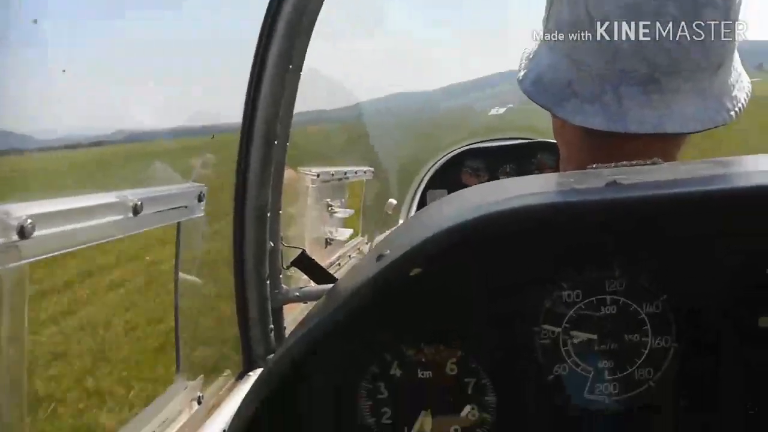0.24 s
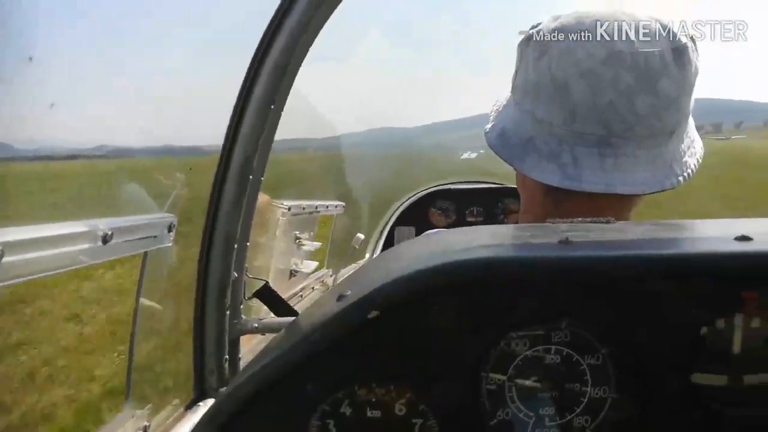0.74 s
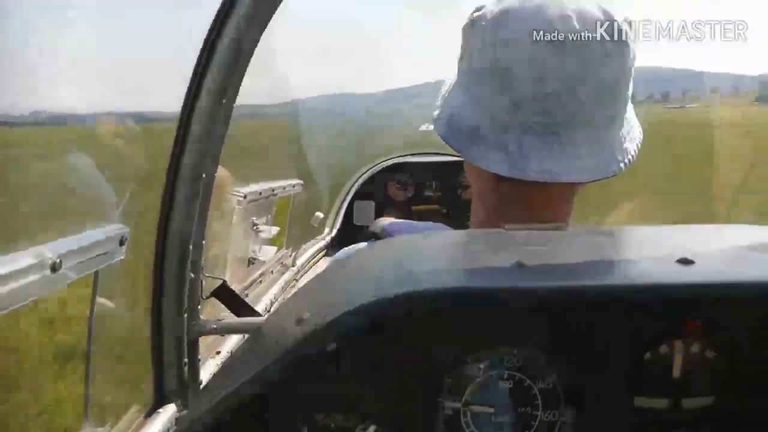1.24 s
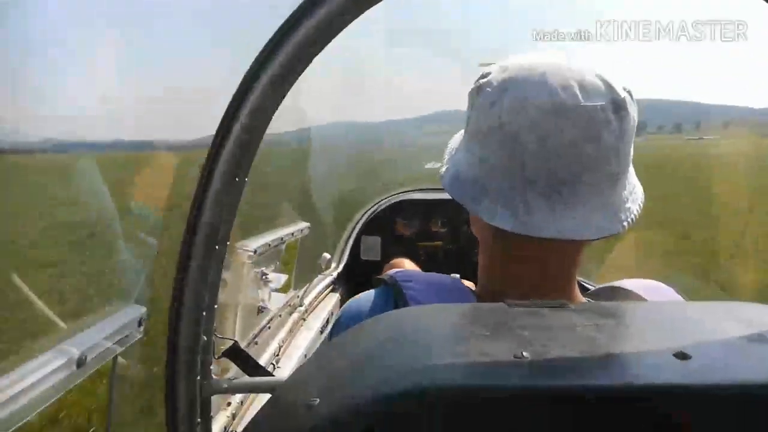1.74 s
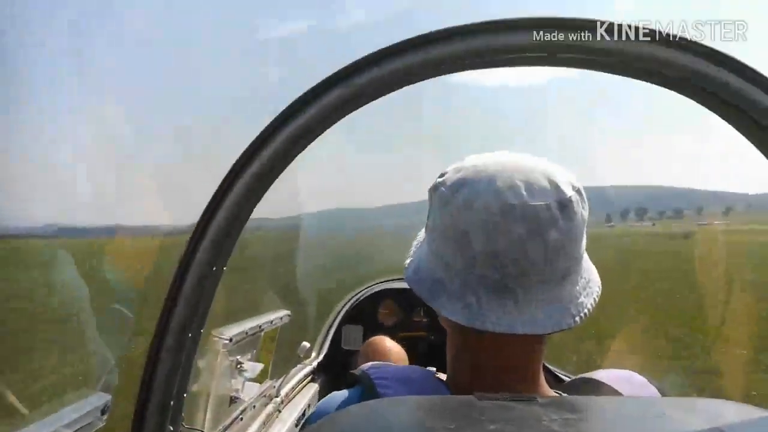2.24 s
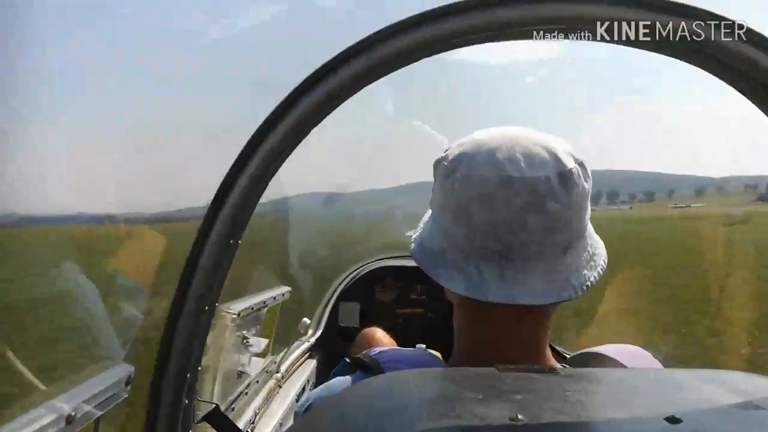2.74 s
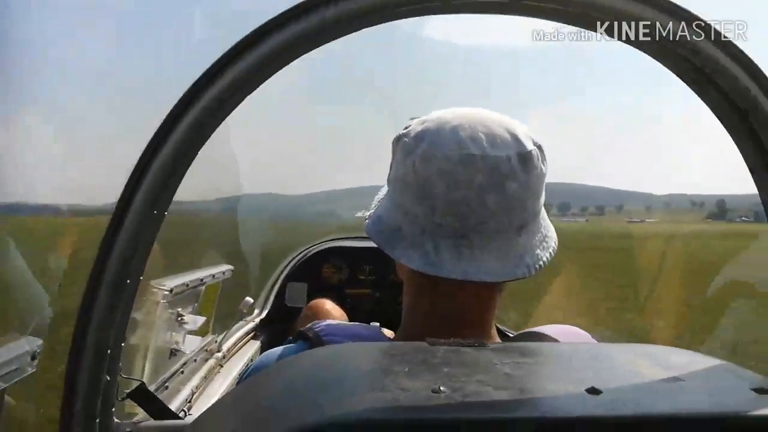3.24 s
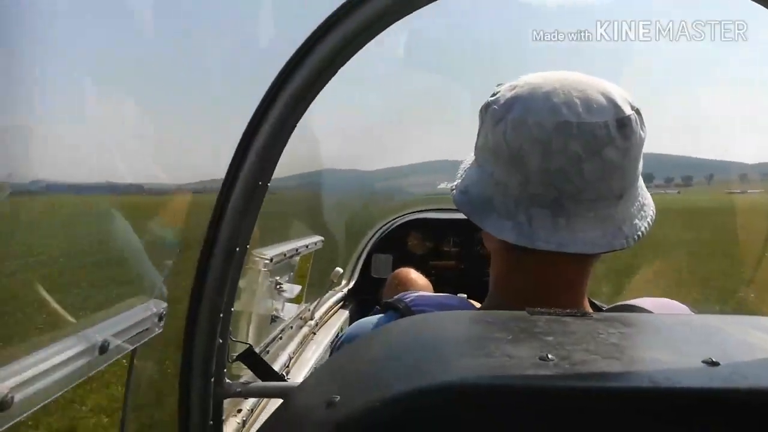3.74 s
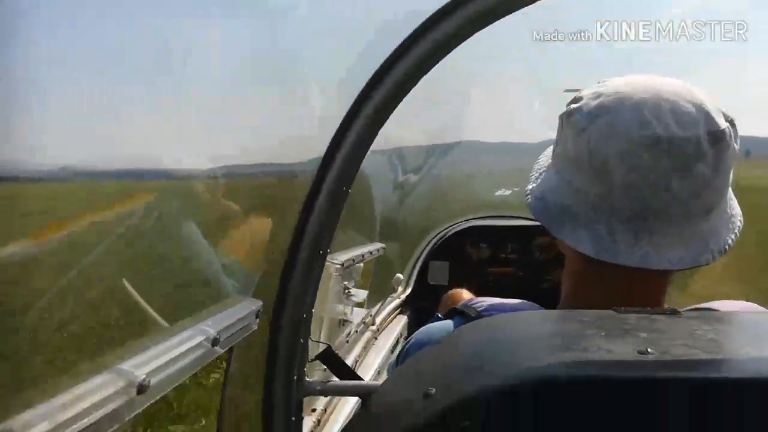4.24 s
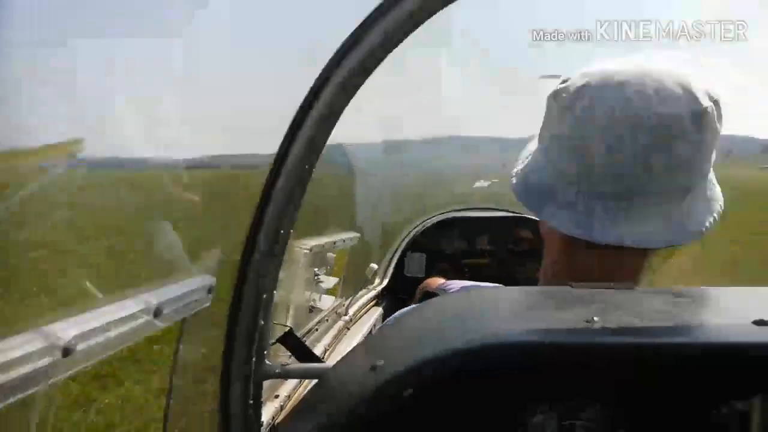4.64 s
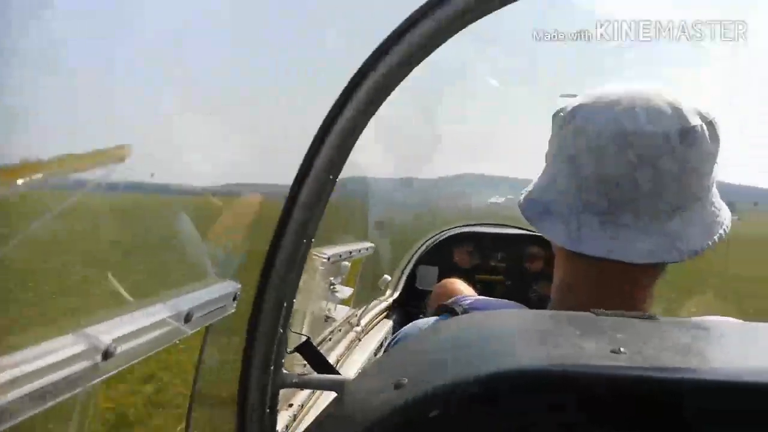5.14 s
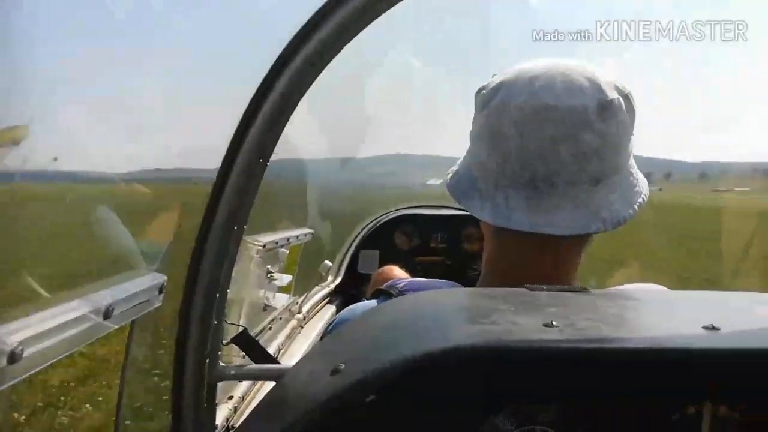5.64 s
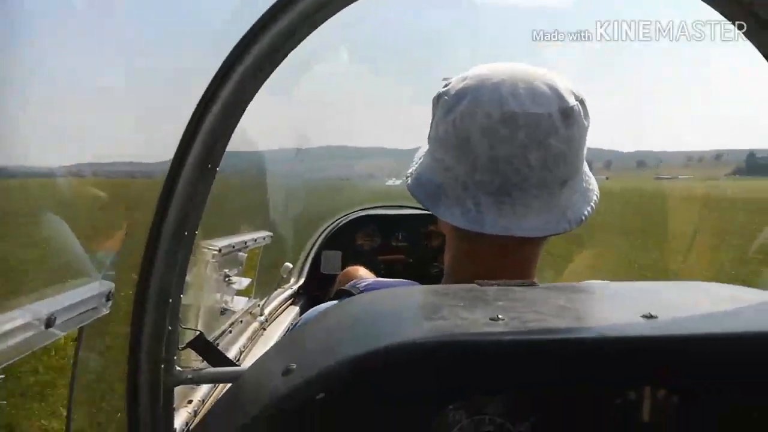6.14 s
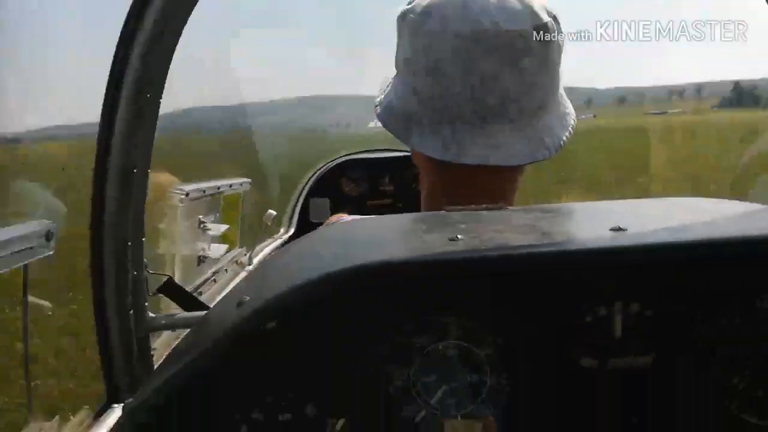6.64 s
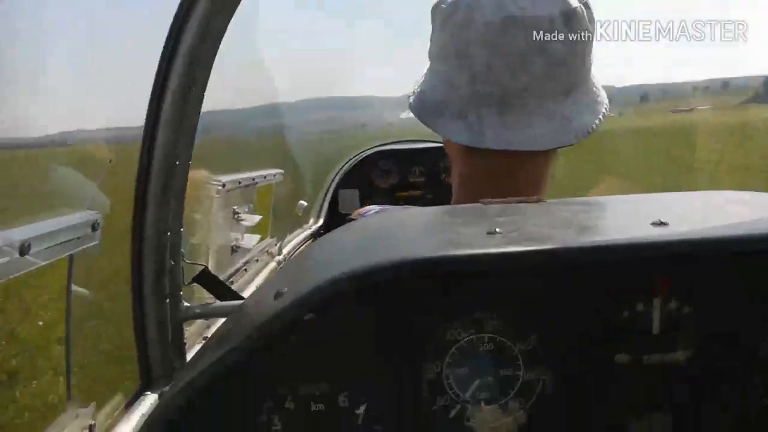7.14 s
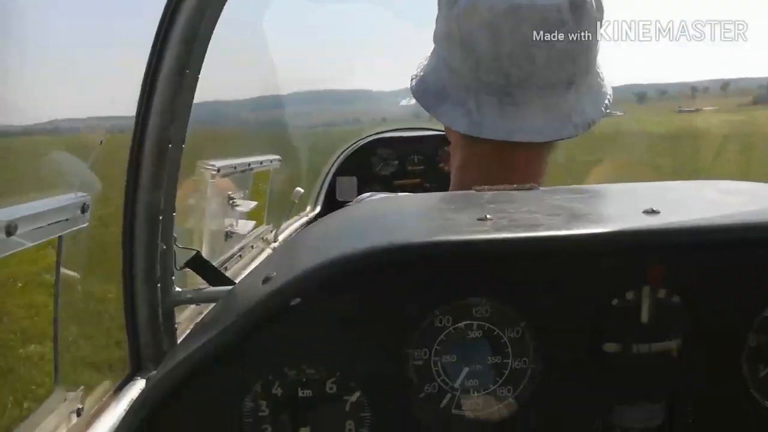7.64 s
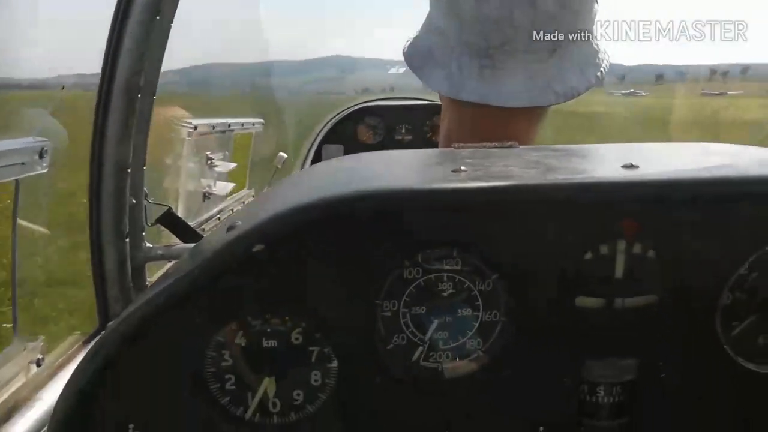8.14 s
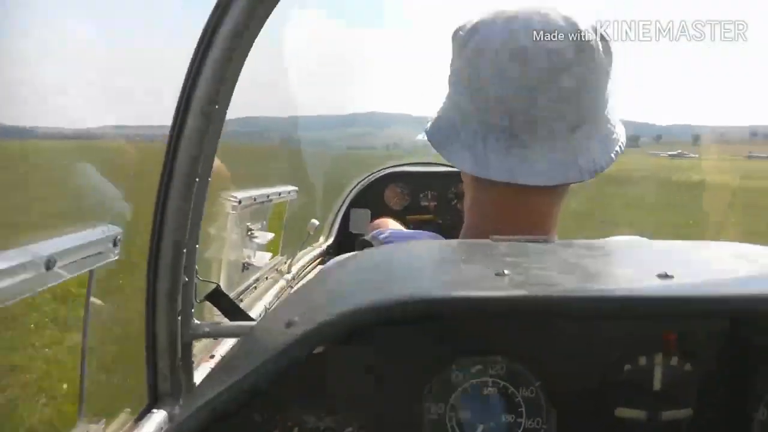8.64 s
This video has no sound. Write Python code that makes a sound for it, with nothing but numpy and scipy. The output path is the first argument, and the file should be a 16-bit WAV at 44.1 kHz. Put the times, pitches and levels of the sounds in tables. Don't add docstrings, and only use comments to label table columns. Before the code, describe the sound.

Inside a closed glider cockpit, the wheel rumbles and thuds over rough grass, fittings rattle, air hisses, and one violent jolt overloads the microphone.

```python
import sys
import numpy as np
from scipy import signal
from scipy.io import wavfile
from scipy.ndimage import uniform_filter1d

SR = 44100
rng = np.random.default_rng(int(sys.argv[2]) if len(sys.argv) > 2 else 0)


def dump(signal):
    limited = np.clip(np.atleast_2d(signal).T, -1, 1)
    pcm = np.round(limited * 32767).astype(np.int16)
    wavfile.write(sys.argv[1], SR, pcm)


def rack_gain(trim_db):
    fader = np.asarray(trim_db, float)
    return 10 ** (fader / 20)


N = 392049
T = np.arange(N) / SR

# (frequency [Hz], density [dB per Hz])
RUMBLE_COLOUR = [(15, -37), (26, -16.5), (36, 2.5), (70, -2.5), (110, -5), (160, -13.5), (300, -77)]
# (frequency [Hz], density [dB per Hz])
DRUMMING_COLOUR = [(60, -18.5), (100, -3), (130, -2), (250, -7), (330, -11), (420, -18.5), (550, -40.5),
                   (900, -83)]
# (frequency [Hz], density [dB per Hz])
RATTLE_COLOUR = [(250, -29.5), (400, 3), (550, 0), (1000, -6.5), (1500, -9), (2100, -11), (2700, -19),
                 (4000, -24.5), (8000, -64)]
# (frequency [Hz], density [dB per Hz])
HISS_COLOUR = [(1200, -24), (2500, -2), (3200, -3.5), (5000, -0.5), (7800, -6), (10000, -15),
               (13000, -19.5), (16500, -27)]
# (frequency [Hz], density [dB per Hz])
JET_COLOUR = [(5000, -30), (7000, 13.5), (9500, 5), (12500, -12), (14000, -4), (14800, 6), (15400, 6),
              (16500, -0.5)]
# (frequency [Hz], density [dB per Hz])
KNOCK_COLOUR = [(300, -43), (550, 0), (900, -2.5), (1500, -2.5), (2200, -1), (3000, -13), (6000, -20),
                (9000, -37.5)]
# (frequency [Hz], density [dB per Hz])
SNAP_COLOUR = [(1500, -7), (3000, 1), (4500, 1), (7500, -9.5), (9500, -18), (12000, -37)]
# (frequency [Hz], density [dB per Hz])
FIZZ_COLOUR = [(4500, -3), (6500, 3.5), (9000, -3), (12000, -7), (15500, -8), (16500, -4.5)]

# (frequency [Hz], width [Hz], boost [dB])
HULL_MODES = [(35.7, 9.2, 7), (60.5, 13, 7), (87, 12, 2.5), (152.6, 10.7, 4.5), (193.5, 11, 3),
              (242.6, 39, 6.5), (296, 34, 2), (357, 37, 3), (622, 72, 6), (885, 73, 5), (1420, 49, 1),
              (3130, 52, 3.5), (7400, 60, -1.5)]
# (frequency [Hz], share [dB])
PORT_APART = [(40, -21), (80, -24), (170, -11.5), (300, -3.5), (430, 0.2), (520, -1.5), (630, -4),
              (800, 2.1), (870, -1.2), (1000, -2.5), (1350, 0.8), (1800, -1.46), (15000, 3)]
# (frequency [Hz], lead [rad])
PORT_LEAD = [(290, 0), (350, 1.38), (500, 1.76), (570, 2.5), (720, 3.5), (1130, 0.2), (1400, 0),
             (1800, -1.5), (2300, -2)]
# (frequency [Hz], difference [dB])
PORT_LEAN = [(200, 0), (350, 0.5), (500, 6.5), (630, 2), (870, -3.5), (1000, 0), (1400, -6.5), (2100, -6),
             (3000, -0.5), (5000, -0.5), (7000, 7.5), (12000, 9)]

# (time [s], shaking [dB])
SHAKING = [(0.0, -35), (1.26, -36.5), (1.63, -38), (1.93, -40), (2.5, -43), (3.14, -43), (3.66, -41.5),
           (4.51, -43.5), (5.67, -44.5), (5.87, -46), (6.88, -46.5), (7.6, -48.5), (7.82, -48),
           (7.95, -44.5), (8.12, -49), (8.42, -49.5), (8.62, -51), (8.89, -46.5)]
# (time [s], level [dB])
VENT_FLOW = [(0.0, -82.5), (1.21, -85), (1.48, -71), (2.38, -84.5), (2.57, -77), (2.99, -65), (4.06, -65),
             (4.18, -71), (4.78, -78), (5.64, -62), (5.99, -72), (7.03, -72), (7.3, -66), (8.49, -77.5),
             (8.89, -69.5)]
# (time [s], wheel lift [dB], hull lift [dB])
BUMPS = [(.0, -3, -0.5), (.08, -3, 4.5), (.42, -5, 0.5), (.72, -1, 4.5), (.84, 2, -0.5), (1.21, 7, -3),
         (1.31, -10.5, 0.5), (1.44, 0.5, 1), (1.56, 3.5, 1), (1.71, 1.5, 5), (1.93, -1, -3.5),
         (2.13, -10, 0.5), (2.22, 0.5, -1), (2.38, 3, 2), (2.52, -4.5, -5.5), (2.65, 0, 2), (2.78, -2, -3),
         (3.22, -2.5, 1), (3.57, -2, -5), (3.73, -5, -4), (4.46, 7, 1), (4.68, 5, 0), (5.1, 8, 0.5),
         (6.12, 3, -0.7), (6.77, 5, -1), (7.53, 4.5, 3.5), (7.72, -4, -2.5), (7.87, 3.5, 0),
         (8.22, 3, -1.7), (8.76, 6, -2)]
# (time [s], frequency [Hz], level [dB])
WHEEL_HUM = [
    (5.5, 38.45, -25),
    (5.99, 38.46, -25.5),
    (6.33, 44.1, -28),
    (6.47, 37.23, -22.5),
    (7.65, 36.83, -24.5),
    (7.9, 40, -39),
    (8.05, 33.87, -19.5),
    (8.6, 34.67, -22),
    (8.89, 33.1, -33),
]

# (start [s], length [s], level [dB])
GROANS = [
    (7.809, 0.254, -38),
    (7.811, 0.075, -36.5),
    (7.93, 0.092, -39),
    (4.16, 0.08, -36),
    (6.93, 0.04, -41),
    (5.31, 0.19, -37),
    (8.243, .045, -41),
    (7.395, .03, -41),
]
# (frequency [Hz], width [Hz], level [dB])
GROAN_MODES = [(229, 40, 7), (434, 160, 2.5), (623, 170, 0), (940, 120, -4.5), (1290, 500, -12),
               (1950, 300, -23)]

# (time [s], peak [dB])
SNAPS = [(0.5297, -33.5), (0.7562, -35), (0.7881, -35), (0.8475, -41.5), (1.1962, -38), (1.5554, -40),
         (1.8043, -39), (2.0388, -35), (2.5137, -38.5), (2.6838, -42), (2.7691, -45), (3.3513, -38.5),
         (3.9489, -38), (4.1654, -42), (4.5166, -35), (4.6503, -29.5), (4.8005, -38.5), (5.006, -37),
         (5.3303, -38), (5.399, -36.5), (6.2043, -56), (6.3739, -38.5), (6.6822, -39.5), (7.3552, -41),
         (7.5128, -42), (7.881, -41), (8.2287, -42), (8.5595, -36), (8.6517, -40.5)]
# (time [s], peak [dB], t60 [s])
CRACKS = [
    (0.201, -19.5, .045),
    (1.798, -25.5, 0.046),
    (1.812, -31.5, 0.38),
    (4.972, -56, .06),
    (4.36, -42, 0.11),
]
# (time [s], peak [dB])
FLICKS = [(0.2833, -47.5), (0.4963, -44), (0.5227, -43.5), (0.7901, -49), (1.4147, -42.5), (1.5189, -49),
          (2.037, -40.5), (2.6818, -46), (2.7681, -45), (2.8519, -47), (2.9083, -55.5), (3.1657, -46.5),
          (3.2655, -45), (3.3648, -47.5), (3.4476, -46), (3.9195, -46.5), (4.1046, -45.5), (4.1669, -47),
          (4.3814, -46), (4.6624, -41), (4.8015, -47), (4.9716, -47), (5.3018, -46), (5.4176, -43),
          (7.8775, -41), (8.1249, -48), (8.1843, -46.5), (8.557, -39), (8.5964, -48),
          (0.0802, -51.5), (1.2446, -53), (1.3892, -49), (1.6846, -52), (1.8654, -48), (1.8814, -46.5),
          (1.9264, -49), (2.3545, -51), (2.8245, -55), (4.3535, -53), (4.4403, -52), (4.9122, -61),
          (5.664, -57), (5.7029, -51), (6.0926, -58), (6.1789, -64), (6.2038, -52), (6.318, -58),
          (6.3749, -55), (6.6478, -55), (6.6972, -50), (6.754, -53), (7.2739, -55), (7.3537, -53),
          (7.435, -52), (7.673, -54), (7.9354, -51.5)]
# (time [s], level [dB], t60 [s])
RIPS = [
    (1.798, -46, .03),
    (1.803, -34, .02),
    (1.811, -41, .04),
    (1.817, -40, .14),
    (1.826, -43, .1),
]

# (time [s], peak [dB], pitch [Hz])
KNOCKS = [(0.202, -18.5, 1420), (0.879, -35, 1290), (0.933, -28, 1420), (1.803, -24, 1400),
          (2.058, -34, 1260), (2.18, -36, 2050), (3.949, -30, 1290), (3.953, -28.5, 2110),
          (4.088, -38, 1290), (4.624, -34, 1370), (4.778, -43, 1400), (5.317, -37, 1490),
          (5.532, -29, 1650), (5.779, -36, 1280), (6.106, -32.5, 1340), (6.156, -33.5, 1610),
          (6.213, -29.5, 1680), (6.448, -34.5, 2000), (6.664, -36.5, 1820), (6.794, -36.5, 1680),
          (6.931, -32.5, 1624), (7.11, -31, 1533), (7.18, -32.5, 1640), (7.211, -33, 1710),
          (7.394, -37, 1560), (7.494, -32.5, 1990), (7.768, -36, 1700), (7.806, -38, 1210),
          (8.233, -33.5, 1460), (8.331, -37, 1250), (8.77, -32, 1600),
          (1.826, -22.5, 1400), (1.851, -28, 1300), (3.967, -41, 1870), (4.244, -35, 1290),
           (4.528, -31, 1630), (4.654, -36, 2000), (5.33, -28, 2130), (5.354, -28.5, 1840),
           (5.406, -28.5, 1850), (5.416, -25, 1860), (5.459, -32, 1660), (5.481, -42, 2050),
           (6.064, -37, 1800), (6.259, -39, 1900), (6.465, -32.5, 2080), (7.003, -41, 1700),
           (7.04, -38, 1810), (7.281, -41, 1398), (7.438, -37, 1562), (7.512, -31, 1380),
           (7.54, -32.5, 1586), (7.558, -33, 1600),
          (0.4838, -36.5, 1350), (0.5252, -37, 1580), (0.624, -37.5, 1420), (0.7887, -33, 1260),
        (0.847, -33.5, 1270), (0.9657, -35, 1260), (1.1114, -30, 1370), (1.4063, -34.5, 1300),
        (1.5868, -34, 1280), (1.6586, -45, 1440), (1.7444, -36.5, 1830), (1.944, -37.5, 1560),
        (2.2408, -39, 2250), (2.2814, -33, 1220), (2.361, -37, 1750), (2.3735, -38, 1610),
        (2.5132, -36.5, 1470), (2.9452, -42, 1560), (3.0864, -41, 1610), (3.6461, -44, 1540),
        (4.182, -36.5, 1550), (4.2186, -37.5, 1320), (4.3819, -40, 1290), (4.719, -44, 1600),
        (4.803, -37.5, 1660), (4.9427, -41, 1790), (5.0983, -35, 1420), (5.1272, -38, 1290),
        (6.144, -38, 1380), (6.7092, -33.5, 1530), (7.7358, -45, 1251), (7.8301, -40, 1580),
        (8.6063, -40.5, 1390), (8.6767, -38, 1770), (8.7909, -33, 1645)]
# (time [s], level [dB], frequency [Hz], t60 [s])
PINGS = [
    (5.398, -41, 4800, .05),
    (5.399, -42, 7550, .1),
    (8.229, -43, 4940, .04),
    (1.849, -43, 7000, .04),
    (7.215, -42, 2500, .06),
    (.205, -29, 2060, .04),
    (.204, -27, 1150, .05),
    (.218, -29, 1430, .08),
]

# (frequency [Hz], first swing outwards [full scale], t60 [s])
JOLT_MODES = [
    (85, 2.7, .05),
    (42, -.85, .26),
    (250, .4, .07),
]
# (middle [s], peak [dB], pitch [Hz])
THUDS = [(0.078, -24, 107), (0.093, -16, 48.3), (0.134, -17, 93), (0.342, -18, 94), (0.543, -15.5, 47),
         (0.618, -23, 97.5), (0.682, -21, 97), (0.711, -19, 59), (0.772, -15.5, 59.6), (0.794, -20, 123.5),
         (0.833, -14.0, 54), (0.846, -17.5, 123), (1.109, -15.5, 81), (1.231, -16, 93), (1.379, -17.5, 98),
         (1.393, -12.5, 54), (1.441, -16, 97), (1.501, -11, 59), (1.527, -13, 119.5), (1.561, -11.5, 59.7),
         (1.625, -14.5, 60), (2.075, -14.5, 54), (2.191, -14, 55.3), (2.28, -15, 55), (2.344, -15.5, 65),
         (2.658, -20.5, 96), (2.664, -21, 54.3), (2.801, -25, 60.4), (3.17, -16, 65.4),
         (3.213, -15.5, 47.3), (3.357, -18.0, 47.6), (3.445, -17.5, 108.4), (3.448, -14, 53),
         (3.585, -13.5, 48), (3.814, -17, 53.6), (3.889, -22, 97), (4.173, -16.5, 54), (4.357, -12.5, 64.3),
         (4.457, -10.5, 59), (4.635, -12, 54), (4.696, -19, 82), (4.78, -18.0, 80.4), (4.955, -13, 47.5),
         (4.996, -14, 52.3), (5.132, -28, 92), (5.207, -16, 87.6), (5.323, -14, 107.8), (6.107, -17, 93.6),
         (6.13, -16.0, 48), (6.249, -21, 54.4), (6.43, -16, 48.26), (6.51, -21.0, 129.6),
         (6.728, -15, 47.8), (7.204, -20.0, 91.5), (7.416, -14.5, 48), (7.576, -14, 88.4),
         (7.88, -18.5, 113.6), (8.239, -15, 82.5), (8.359, -17, 88), (8.755, -14.5, 85.3)]
# (middle [s], peak [dB], pitch [Hz])
BOOMS = [(0.044, -15, 245), (0.07, -12.5, 143), (0.07, -21, 246), (0.095, -12.5, 140), (0.157, -17, 176),
         (0.267, -17.0, 135), (0.432, -14.0, 150), (0.477, -18, 179), (0.498, -17.0, 207),
         (0.528, -14, 237), (0.598, -14.5, 161), (0.656, -17, 242), (0.656, -15, 145), (0.701, -13.5, 246),
         (0.73, -15.0, 216), (0.752, -20, 224), (0.787, -12, 239), (0.802, -18, 135), (0.903, -19, 151),
         (0.916, -18, 216), (0.942, -17, 240), (1.133, -18.0, 281), (1.295, -14, 179), (1.353, -15.5, 151),
         (1.502, -12, 156), (1.695, -16.5, 165), (1.755, -18, 230), (2.151, -16.5, 235),
         (2.339, -22.5, 230), (2.444, -17, 157), (2.64, -20.5, 196), (2.879, -21.5, 200),
         (2.94, -15.5, 240), (3.123, -19, 168), (3.225, -18, 145), (3.332, -17.5, 241), (3.57, -18.5, 152),
         (3.869, -17.5, 164), (3.942, -20.5, 136), (3.976, -16, 250), (4.156, -15.5, 237),
         (4.635, -18, 158), (4.685, -16.5, 161), (4.824, -16.5, 148), (4.885, -16, 154),
         (4.937, -20.5, 222), (5.1, -19, 172), (5.399, -20.5, 217), (5.436, -18, 224), (5.616, -17, 151),
         (5.648, -22.5, 194), (6.359, -19, 221), (6.413, -21, 177), (6.502, -16.5, 135),
         (6.535, -19.5, 158), (6.754, -17.5, 155), (7.549, -20, 226), (7.822, -18.5, 241),
         (7.875, -18, 222.5), (7.979, -19, 161)]
# (middle [s], peak [dB], pitch [Hz])
BLOWS = [
    (1.83, -15.5, 209),
    (1.866, -14, 130),
    (5.23, -20.5, 150),
    (7.4, -22, 150),
    (7.55, -19, 150),
    (7.83, -16, 101),
    (7.95, -18, 101),
    (8.0, -18.5, 95),
    (8.2, -24.5, 200),
]

JOLT_S = 1.8002
THUD_S, BOOM_S = .085, 0.04466


def evened(x):
    return x / np.sqrt(np.mean(np.atleast_2d(x).mean(0) ** 2) + 1e-20)


def read(points, hz):
    f, value = np.transpose(points)
    return np.interp(np.log(hz + 1), np.log(f + 1), value)


def track(points):
    return np.interp(T, *np.transpose(points))


def add(mix, s, sound):
    part = mix[..., round(s * SR):][..., :sound.shape[-1]]
    part += sound[..., :part.shape[-1]]


def noise(spectrum, size, patchy_db=0., lumpy_db=0., wide=9):
    hop, hz = size // 4, np.fft.rfftfreq(size, 1 / SR)
    a, b, c, d, patches = rng.standard_normal((N // hop + 5, len(hz), 5)).T
    patches = uniform_filter1d(patches, size=int(wide), axis=0)
    patches = uniform_filter1d(patches, size=9, axis=1)
    lumps = uniform_filter1d(rng.standard_normal(a.shape[1]), size=5)
    drift_db = patchy_db * patches / patches.std() + lumpy_db * lumps / lumps.std()
    hull_db = sum(db / (1 + (2 * (hz - f) / width) ** 2) for f, width, db in HULL_MODES)
    colour = rack_gain((read(spectrum, hz) + hull_db)[:, None] + drift_db)
    apart = rack_gain(np.minimum(read(PORT_APART, hz), 0))[:, None]
    lag = np.exp(-1j * read(PORT_LEAD, hz))[:, None]
    lean = rack_gain(read(PORT_LEAN, hz) / 2)[:, None]
    left = a + 1j * b
    right = np.sqrt(1 - apart ** 2) * left * lag + apart * (c + 1j * d)
    z = np.array([left * lean, right / lean]) * colour
    return evened(signal.istft(z, nperseg=size, noverlap=size - hop)[1][:, :N])


def bursts(rows, hold_s, rise_s):
    power, t = np.zeros(N), np.arange(SR // 3) / SR
    rise = np.minimum(t / rise_s, 1)
    for s, db, t60 in rows:
        decay = rack_gain(db - 60 * np.maximum(t - hold_s, 0) / max(t60, .02))
        add(power, s, (decay * rise) ** 2)
    return np.sqrt(power)


def chatter(per_s, spread_db, t60):
    size = rack_gain(spread_db * np.minimum(rng.exponential(1, N), 5))
    size = size * (rng.random(N) < per_s / SR)
    power = signal.lfilter([1], [1, -rack_gain(-120 / (t60 * SR))], size ** 2)
    return evened(np.sqrt(power + 1e-9))


def ring(db, hz, t60):
    t = np.arange(SR // 8) / SR
    decay = rack_gain(db - 60 * t / max(t60, .01))
    return decay * np.sin(2 * np.pi * hz * t) * np.minimum(t / 0.00077, 1)


def lumped(bed, rows, length):
    out, t = bed.copy(), np.arange(round(length * SR)) / SR
    swell = np.sin(np.pi * t / length) ** 2
    for s, db, hz in rows:
        start = max(s - length / 2, 0)
        stretch = bed[:, round(start * SR):][:, :len(t)]
        probe = swell * np.cos(2 * np.pi * hz * (t - length / 2))
        near = signal.fftconvolve(stretch, probe[None], "same", axes=1)
        wave = 1.08 * rack_gain(db) * np.sin(2 * np.pi * (hz * t + rng.random()))
        size = near.shape[1]
        add(out, start, swell[:size] * (wave[:size] - near * 2 / swell.sum()))
    return out


def shaking():
    return track(SHAKING) + 43


def bump_lifts():
    width_s = 0.082
    return sum(np.outer(lifts, np.exp(-((T - s) / width_s) ** 2)) for s, *lifts in BUMPS)


def vent_jet():
    return rack_gain(track(VENT_FLOW) + 1.5) * noise(JET_COLOUR, size=1024, patchy_db=4.0, wide=4)


def air_stream():
    vent_db = track(VENT_FLOW) + 72
    level = rack_gain(-54 + 0.62 * shaking() + 0.23 * vent_db - 0.45 * T)
    hiss = noise(HISS_COLOUR, size=1024, patchy_db=2.0, lumpy_db=1.76, wide=3.4)
    return level * hiss * (0.84 + 0.08 * chatter(60, 5.6, 0.048))


def wheel_hum():
    s, hz, db = np.transpose(WHEEL_HUM)
    rise = np.clip((T - s[0]) / 0.19, 0, 1)
    swell = rise * rack_gain(np.interp(T, s, db) + 1.4)
    return np.sqrt(2) * swell * np.sin(2 * np.pi * np.cumsum(np.interp(T, s, hz)) / SR)


def groans():
    hz = np.geomspace(100, 4000, num=200)
    power = sum(rack_gain(2 * db) / (1 + (2 * (hz - f) / width) ** 2) ** 2 for f, width, db in GROAN_MODES)
    load = np.zeros(N)
    for s, length, db in GROANS:
        grip, release = (T - s) / 0.003, (s + length - T) / 0.0078
        load += rack_gain(db) * np.clip(np.minimum(grip, release), 0, 1)
    return load * noise(np.c_[hz, 10 * np.log10(power)], size=2048)


def snaps():
    cracking = [(s, db, 0.13) for s, db in SNAPS] + CRACKS
    body = bursts([(s, db - 14.0, t60) for s, db, t60 in cracking], 0.0044, 0.0025)
    top = bursts([(s, db - 5.0, .055) for s, db in FLICKS] + RIPS, 0.0054, 0.0016)
    grit = 0.64 + .5 * chatter(980, 3.0, 0.0081)
    return grit * (body * noise(SNAP_COLOUR, size=256) + top * noise(FIZZ_COLOUR, size=256))


def knocks():
    t60, blows = 0.1, KNOCKS
    grain = 0.8 + 0.12 * chatter(330, 3.4, 0.026)
    envelope = bursts([(s, db - 9.0, 1.02 * t60) for s, db, hz in blows], 0.0053, 0.001)
    out = grain * envelope * noise(KNOCK_COLOUR, size=256)
    for s, db, hz in blows:
        ringing = ring(db - 7.5, hz, 0.46 * t60) + ring(db - 14.5, 1.5 * hz, 0.27 * t60)
        add(out, s, rack_gain([[-4.], [3.]]) * ringing)
    for s, db, hz, ping_t60 in PINGS:
        add(out, s, ring(db, hz, ping_t60)[None])
    return out


def cockpit_rattle():
    level = rack_gain(-42.5 + 0.9 * shaking() + 0.21 * bump_lifts().sum(0))
    rattle = noise(RATTLE_COLOUR, size=1024, patchy_db=1.5, lumpy_db=1.1, wide=4)
    return level * rattle * (0.78 + 0.12 * chatter(120, 3.2, 0.054))


def jolt():
    t = np.maximum(T - JOLT_S, 0)
    modes = sum(swing * rack_gain(-60 * t / t60) * np.sin(2 * np.pi * hz * t) for hz, swing, t60 in JOLT_MODES)
    return -np.minimum(t / .0035, 1) * modes


def wheel_rumble():
    rumble = noise(RUMBLE_COLOUR, size=4096, lumpy_db=-0.7)
    throb = signal.sosfiltfilt(signal.butter(2, 58, fs=SR, output="sos"), rumble)
    return rumble + (rack_gain(2.5 - 1.5 * T) - 1) * throb


def rolling_hull(tussocks):
    shake_db, (wheel_db, hull_db) = shaking(), bump_lifts()
    rumble = rack_gain(-19 + 0.061 * shake_db + wheel_db) * wheel_rumble()
    drum_level = rack_gain(-20.5 + 0.47 * shake_db + hull_db - 0.31 * T)
    drumming = drum_level * noise(DRUMMING_COLOUR, size=4096, patchy_db=2.0, wide=3)
    hull = rack_gain(-3.0) * tussocks * (rumble + drumming)
    hull = lumped(lumped(hull, THUDS, THUD_S), BOOMS, BOOM_S)
    unloaded = 1 - .85 * np.exp(-((T - JOLT_S - .012) / .022) ** 4)
    return lumped(hull * unloaded, BLOWS, BOOM_S)


def scene():
    tussocks = 0.93 + 0.21 * uniform_filter1d(chatter(25, 3.17, 1.0), size=600)
    background = vent_jet() + air_stream() + wheel_hum() + groans()
    fittings = snaps() + knocks() + tussocks * cockpit_rattle()
    return background + fittings + jolt() + rolling_hull(tussocks)


def band_limit(x):
    return signal.sosfilt(signal.butter(12, 15650, fs=SR, output="sos"), x)


def record(dry):
    heard = signal.sosfiltfilt(signal.butter(4, 30, "high", fs=SR, output="sos"), dry)
    clipped = np.clip(heard, -.99, .99)
    limited = signal.oaconvolve(clipped, signal.firwin(255, 15700, fs=SR)[None], "same")
    return band_limit(limited)


dry = scene()
out = record(dry)
dump(out)
```